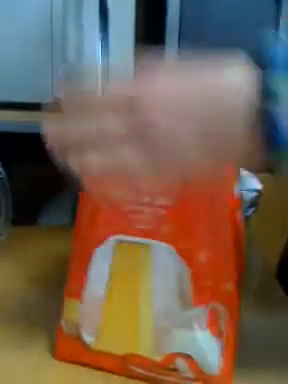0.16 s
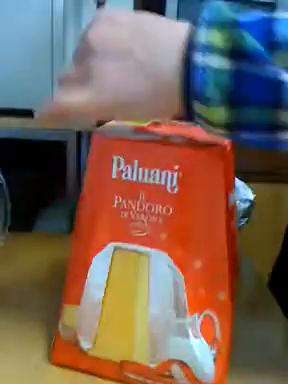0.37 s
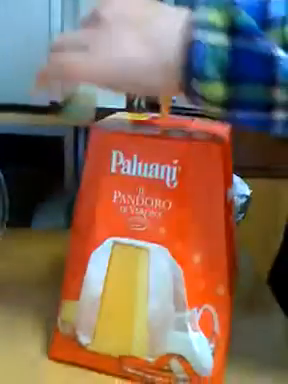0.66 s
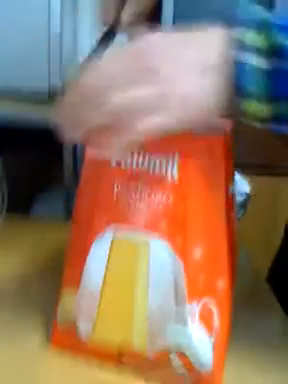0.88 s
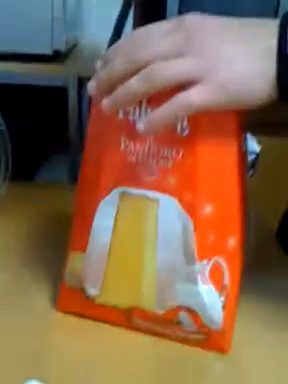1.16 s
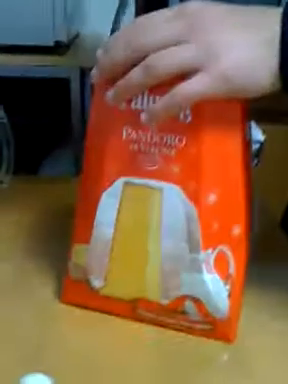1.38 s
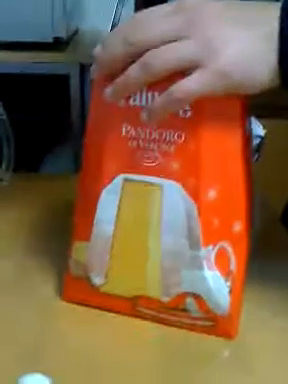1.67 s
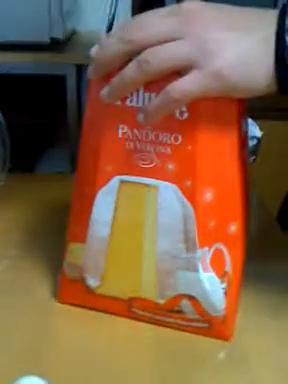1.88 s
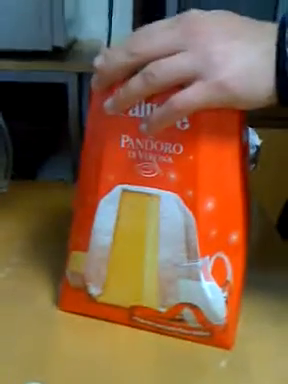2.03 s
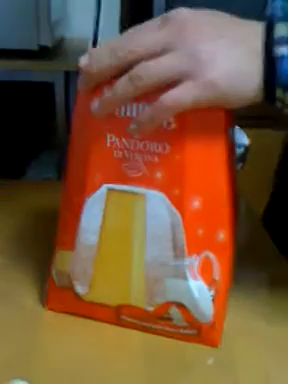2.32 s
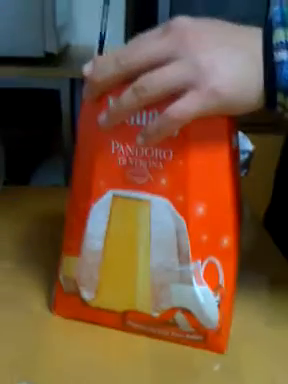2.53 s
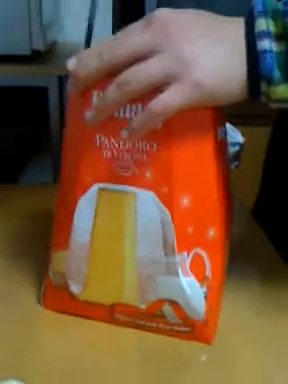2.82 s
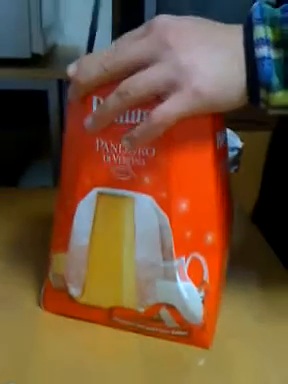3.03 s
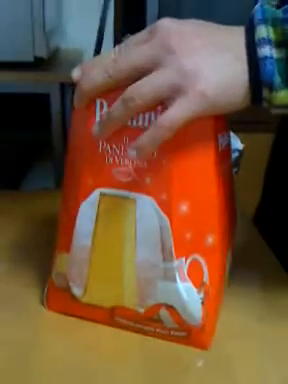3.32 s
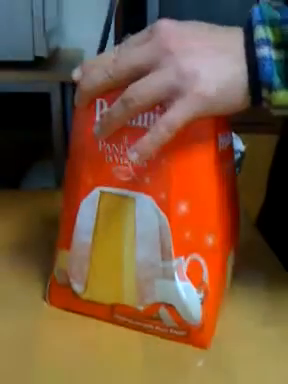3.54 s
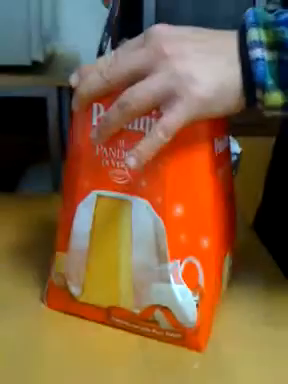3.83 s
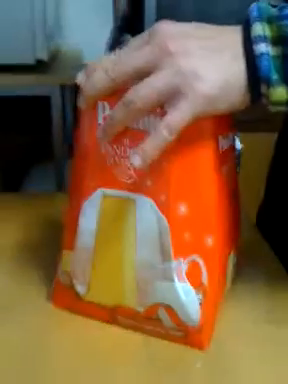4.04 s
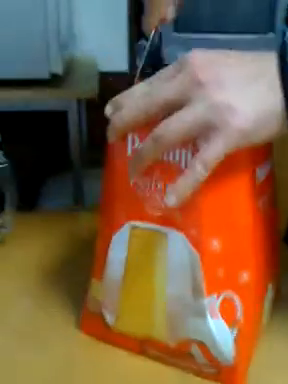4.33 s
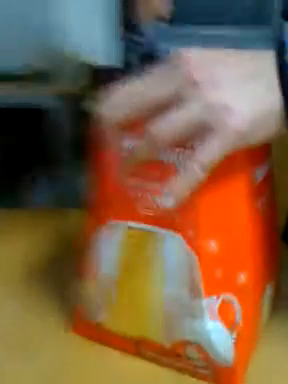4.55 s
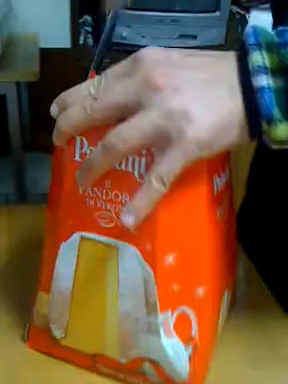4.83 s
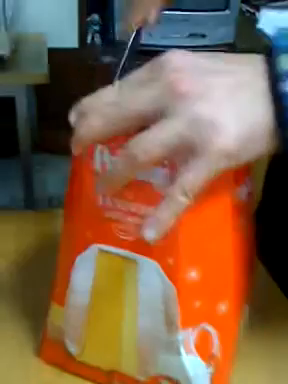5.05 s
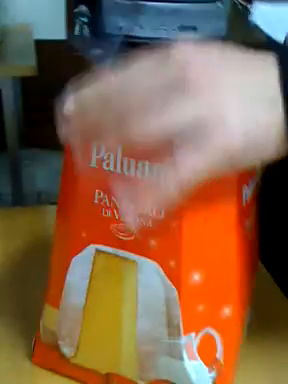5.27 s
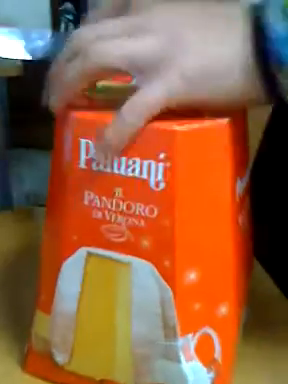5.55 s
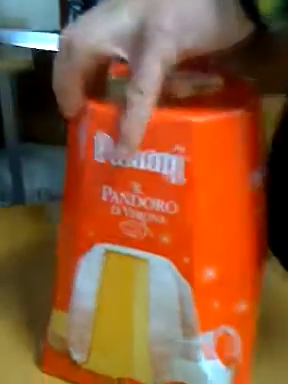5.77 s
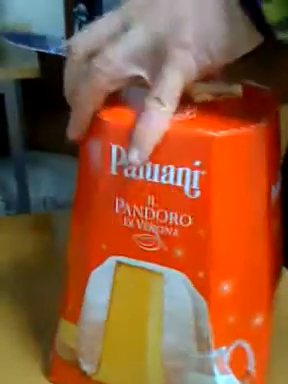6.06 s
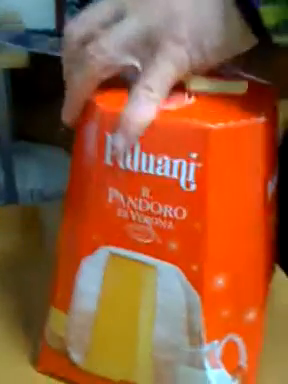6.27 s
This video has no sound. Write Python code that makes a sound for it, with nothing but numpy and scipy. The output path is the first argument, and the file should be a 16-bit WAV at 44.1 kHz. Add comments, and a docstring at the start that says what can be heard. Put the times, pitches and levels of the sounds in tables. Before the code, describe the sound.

A small quiet room carries steady soft broadband noise, slight microphone hiss and faint wavering low hum. Close by, a faint papery rub fades during the first 0.3 seconds; a light brush comes near 0.75, and tiny ticks follow. From 1.5 to 2.7 seconds there are dry clicks, short scrapes and a soft hollow thump at 2.06. From 2.8 to 4.3 the sawing strokes come quicker and rougher, with crisp fibre ticks, and a bright wall knock at 4.33. Between 4.4 and 5.1 the hollow box groans and judders loudly around 230 to 430 hertz, with knocks and a hard crack at 4.91. A snap at 5.13 leads into quieter rubbing until 5.8. Crackling then grows; a deep double thump lands at 6.12, and sharp bright snaps and tearing, strongest at 6.25, continue to the end at about 6.4.

```python
"""On a wooden table in a quiet kitchen, a knife saws in short strokes at the lid of a hollow cardboard box.
Each stroke is made of random slips that ring the thin lid (rasp), the walls, the air inside and the table.
Snapping fibres are clicks and bursts of noise, knocks are short pushes that ring the box, and
brief glides on the glossy print are narrow hisses. A little room echo follows these sounds.
The kitchen is broad noise, microphone hiss included, with a few wavering low tones."""
import sys
import numpy as np
from scipy import signal
from scipy.fft import rfft, irfft, next_fast_len
from scipy.io import wavfile
from scipy.ndimage import uniform_filter1d

SR = 44100
rng = np.random.default_rng(int(sys.argv[2]) if len(sys.argv) > 2 else 0)


def master(y):
    """Save y as 16-bit WAV."""
    cut = np.clip(np.atleast_2d(y).T, -1, 1)
    pcm = np.round(cut * 32767)  # scale
    wavfile.write(sys.argv[1], SR, pcm.astype(np.int16))


N = 281903  # length in samples

# Colour of the kitchen noise: [f/Hz, relative level per Hz/dB]
KITCHEN_COLOUR = [(15, -31), (25, 10), (74, -15), (96, -6.5), (221, -3), (251, -11), (318, -5.5),
                  (433, -15.5), (547, -16.5), (851, -22), (1020, -23), (2880, -29), (10000, -32.5),
                  (12300, -38.5), (16000, -79), (22000, -120)]
# Wavering appliance tones: [f/Hz, width of each filter pass/Hz, rms level/dB]
APPLIANCE_TONES = [(66.8, 4, -60), (214.2, 8, -65.5), (288.4, 21, -61.5), (326.5, 9.7, -61),
                   (1032, 170, -68.5)]
# Skin or blade gliding on the glossy print:
# [middle t/s, half length/s, f/Hz, width of each filter pass/Hz, rms level at the middle/dB]
GLIDES = [(0.746, 0.015, 4800, 1300, -50.5), (5.163, 0.037, 4320, 400, -52.5),
          (5.36, 0.042, 6550, 500, -60)]
# Resonances of the air in the box, its walls, the thin lid and the table top:
# [f/Hz, width/Hz, relative level/dB]
AIR_MODES = [(111, 18, -5), (152.5, 119, -1.5), (185.7, 48, 2), (211.2, 22.2, 0), (260.5, 16.2, -4),
             (323, 20.5, 0), (395.3, 30.2, -1), (427.7, 44.6, -2.5), (520, 58, -9.5), (545, 39, -8)]
WALL_MODES = [(706, 226, 1.5), (965, 72, 3.5), (1177, 142, 1), (1350, 86, 1), (1465, 85, 0),
              (1790, 300, -3), (2040, 58, 2.5), (2265, 720, -4), (2700, 890, -7.5)]
LID_MODES = [(3570, 2060, -6.5), (4265, 123, -1), (4620, 270, -10), (5430, 290, -1), (5800, 710, -5.5),
             (6380, 176, -1.5), (6740, 190, -3.5), (8120, 1320, -6), (9010, 1880, -7)]
TABLE_MODES = [(42, 52, 1), (105, 108, 0.5)]
# Knocks of box on table or blade on box:
# [t/s, boom peak level/dB, wall peak level/dB, contact time/ms, favoured boom f/Hz]
KNOCK_EVENTS = [(0.902, -42, -45, 3.2, 342), (1.048, -48, -48, 2.1, 275), (2.062, -22, -36.5, 2, 377),
                (2.827, -29.5, -45, 1.6, 328), (4.26, -33, -38, 0.66, 345), (4.334, -31, -21.5, 0.83, 412),
                (4.355, -33, -48, 1.2, 400), (4.742, -18.5, -24, 1.3, 305), (4.799, -22.5, -27.5, 1.3, 444),
                (4.893, -15.5, -23.5, 2.8, 426), (4.991, -29, -27.5, 1.31, 334.8),
                (5.055, -26.5, -46, 1.07, 204.2), (5.103, -22, -23.5, 0.48, 223.5),
                (5.227, -35, -28.5, 0.61, 334), (5.326, -35, -35.5, 0.67, 334), (5.427, -35, -38, 2.3, 336),
                (5.99, -18.5, -48, 2.1, 340), (6.123, -9.5, -32, 1.54, 160),
                (6.128, -9.5, -14.5, 0.78, 404), (6.159, -34, -36, 1.7, 203)]
# Fibres and glue letting go: [t/s, burst peak level/dB, drive level into the walls/dB, centre f/Hz]
FIBRE_SNAPS = [(.19, -43, -58, 2290), (.885, -49, -60, 5800), (1.05, -45, -40, 1900),
               (1.14, -50, -50, 1820), (1.493, -27, -33.5, 7300), (1.519, -39, -58, 5650),
               (1.6806, -38.5, -40, 2090), (1.693, -33, -37, 5590), (1.791, -40.5, -40, 5600),
               (1.8716, -41, -52, 1960), (2.022, -36, -51, 5660), (2.049, -29.5, -58, 5800),
               (2.4362, -40, -34.5, 2000), (2.671, -41, -33.5, 2320), (2.7097, -44, -35, 1970),
               (2.9263, -36, -39, 6100), (3.1584, -35, -46, 1860), (3.1722, -46, -38, 2360),
               (3.2742, -25.5, -51, 7200), (3.405, -44, -30.5, 1840), (3.4514, -32, -36, 5060),
               (3.637, -36, -39.5, 6520), (3.7167, -50, -27, 1760), (3.7677, -38, -33, 1850),
               (3.878, -33.5, -38, 6290), (3.9228, -32, -28, 1970), (4.154, -36, -41, 1880),
               (4.284, -41, -41, 6440), (4.565, -34, -40, 1850), (4.7376, -33, -34, 1890),
               (4.8721, -42, -27, 6000), (4.9094, -11, -43, 4370), (5.1289, -20, -26, 4500),
               (5.2603, -27.5, -43, 1730), (5.657, -36, -54, 3500), (5.7193, -26.5, -35, 5260),
               (5.791, -39, -40, 2440), (5.88, -27.5, -28, 4230), (5.897, -27, -46, 5610),
               (5.957, -21, -36, 5900), (5.9896, -16, -38, 5400), (6.0105, -25, -40, 6300),
               (6.1092, -23.5, -29, 1730), (6.1501, -17, -19, 5900), (6.2052, -31, -38, 6130),
               (6.2518, -7, -13.5, 5810), (6.2674, -17.5, -49, 1734), (6.279, -16.5, -49, 1790),
               (6.3064, -18, -45, 1940), (6.34, -30, -47, 1840), (6.3691, -15.5, -32, 1710)]
# Knife strokes and hand rubs: [hardest at t/s, rise/s, fall/s, rasp level/dB, wall level/dB,
# hollow boom level/dB, table rumble level/dB, favoured boom f/Hz]
KNIFE_STROKES = [(.034, 0.19, 0.17, -54.5, -47.5, -46.5, -49, 240),
                 (.745, 0.093, 0.11, -58, -60, -49, -55, 280),
                 (1.698, 0.037, 0.025, -49.5, -43, -42.5, -46, 260),
                 (2.075, 0.036, 0.16, -56.5, -51.5, -45, -41.5, 290),
                 (2.27, 0.13, 0.12, -72, -66, -44, -50, 235),
                 (2.445, 0.067, 0.11, -56.5, -51.5, -59, -54, 235),
                 (2.54, 0.32, 0.24, -56.5, -56, -48, -51, 288),
                 (2.682, 0.027, 0.23, -50.5, -49, -46.5, -47, 242),
                 (2.843, 0.058, 0.061, -56, -55, -40.5, -40.5, 276),
                 (2.94, 0.033, 0.14, -48, -44.5, -40.5, -47, 244),
                 (3.04, 0.11, 0.066, -50, -49.5, -40.5, -44.5, 295),
                 (3.165, .02, 0.084, -43, -45, -53, -51, 240),
                 (3.2, 0.088, 0.096, -50.5, -42, -32.5, -43.5, 265),
                 (3.281, .05, .11, -45, -44, -35, -41, 300),
                 (3.452, 0.09, 0.036, -49.5, -44, -39.5, -44, 223),
                 (3.524, .04, 0.057, -48.5, -46.5, -35, -40.5, 271),
                 (3.7, 0.056, 0.14, -50, -43.5, -42, -44, 300),
                 (3.775, .06, 0.09, -51, -49, -43, -37.5, 260),
                 (3.941, 0.078, 0.079, -46.5, -40.5, -35.5, -40.5, 267),
                 (4.065, .11, 0.091, -41.5, -40, -33.5, -39.5, 332),
                 (4.164, 0.033, 0.13, -49.5, -42.5, -39.5, -46, 250),
                 (4.21, 0.087, 0.1, -50, -48, -44, -47, 250),
                 (4.291, 0.092, 0.14, -49.5, -47.5, -42.5, -55, 370),
                 (4.346, 0.041, 0.033, -50.5, -52, -29.5, -40, 424),
                 (4.467, 0.066, 0.059, -41.5, -34, -24, -32, 236),
                 (4.599, 0.066, 0.094, -40, -34, -25, -42, 347),
                 (4.643, 0.11, 0.072, -40.5, -41.5, -29, -37, 275),
                 (4.75, 0.054, 0.13, -43, -31.5, -19.5, -38, 292.8),
                 (4.78, 0.038, 0.041, -58, -36, -20.5, -52, 299.7),
                 (4.908, 0.057, .11, -30, -29.5, -19.5, -32.5, 380),
                 (5.059, 0.043, 0.13, -48.5, -43, -21.5, -55, 233.7),
                 (5.095, 0.11, 0.081, -58.5, -41, -24, -57, 217),
                 (5.137, .05, 0.097, -52, -46.5, -44, -60, 245),
                 (5.229, 0.062, 0.14, -53.5, -48.5, -38.5, -47, 346),
                 (5.334, 0.035, 0.29, -60, -54.5, -41.5, -55, 330),
                 (5.56, 0.17, .2, -60, -53, -48.5, -49, 290),
                 (5.655, 0.23, 0.17, -47, -51, -45.5, -49, 270),
                 (5.817, 0.15, 0.071, -61, -52, -42, -52.5, 270),
                 (5.884, 0.01, 0.32, -43, -41, -36.5, -60, 265),
                 (5.965, 0.062, 0.18, -38, -37, -35.5, -56, 290),
                 (6.013, 0.14, 0.033, -36.5, -32.5, -36.5, -34.5, 288),
                 (6.126, 0.053, 0.042, -34, -32.5, -30, -46, 197),
                 (6.158, 0.045, 0.074, -34, -31.5, -30.5, -50, 214),
                 (6.21, 0.064, 0.078, -38.5, -37, -32.5, -55, 304),
                 (6.295, 0.063, 0.096, -35, -34, -33, -47, 390),
                 (6.39, 0.04, 0.046, -35, -34, -29, -41, 270)]
# The blade's place on the box favours other wall modes: [t/s, favoured wall f/Hz]
WALL_PITCH_PATH = [(0, 830), (4.3, 870), (4.45, 910), (4.75, 700), (5.8, 1013), (5.97, 1260), (6.12, 895),
                   (6.25, 1580), (6.39, 1640)]

KITCHEN_DB = -47.5
ROOM_T60_S, ROOM_DB = 0.24, -16.5  # echo: time to fall 60 dB, level against the direct sound
SNAP_T60_S, TEAR_DB = 0.014, -20.5  # snap: time to fall 60 dB, drive of its tear against its peak
RASP_HZ = 5680  # favoured pitch of the lid
# Level lost over one rise or fall time, in dB: rasp and walls, hollow boom, table rumble
FADE_DB, BOOM_FADE_DB, RUMBLE_FADE_DB = 23.5, 32, 12.5
ROUNDNESS = 1.038  # shape of a stroke: 1 = pointed peak, 2 = bell
TOP_HZ = 12200  # the treble is cut above this


def undb(db):
    """Turn decibels into a gain."""
    return 10 ** (np.asarray(db) / 20)


def unit(x):
    """Scale a sound to an rms level of 1."""
    return x / np.sqrt(np.mean(x ** 2))


def band(x, hz, width):
    """One resonance, which leaves its centre pitch at gain 1."""
    return signal.lfilter(*signal.iirpeak(hz, hz / width, fs=SR), x)


def narrow_noise(hz, width):
    """Noise passed twice through one resonance, at rms 1."""
    return unit(band(band(rng.standard_normal(N), hz, width), hz, width))


def walk(rate):
    """Random levels held for 1 / rate seconds, with smooth slides between them."""
    hold = int(SR / rate)
    steps = np.repeat(rng.standard_normal(N // hold + 1), hold)
    return uniform_filter1d(steps, hold)[:N]


def ring(x, modes, favour_hz=None, octaves=1., sway_db=0.):
    """A body's resonances: grip and blade place favour one pitch, bending makes each mode swell and fade."""
    out = 0
    for k, (hz, width, db) in enumerate(modes):
        if favour_hz is not None:
            db = db - 6 * (np.log2(hz / favour_hz) / octaves) ** 2
        if sway_db:
            db = db + sway_db * walk(25)
        sign = (-1) ** k  # neighbours move in opposite directions
        out = out + sign * undb(db) * band(x, hz, width)
    return out


def grit(per_s, scatter_db):
    """Random slips: clicks of either sign, a few much larger than the rest."""
    hit = rng.random(N) < per_s / SR
    size = undb(scatter_db * rng.exponential(size=N))
    return unit(hit * rng.standard_normal(N) * size)


def kitchen():
    """Broad noise with a barely wavering level, plus narrow wavering tones, mostly in the bass."""
    hz, db = np.transpose(KITCHEN_COLOUR)
    n = next_fast_len(N)
    bin_hz = np.arange(n // 2 + 1) * SR / n
    colour = undb(np.interp(np.log(bin_hz + 1), np.log(hz), db))
    noise = irfft(rfft(rng.standard_normal(n)) * colour, n)[:N]
    air = unit(noise) * undb(KITCHEN_DB + 0.11 * walk(9.6))
    tones = sum(undb(level) * narrow_noise(f, width) for f, width, level in APPLIANCE_TONES)
    return air + tones


def room(x):
    """Echoes blur into a short noisy tail that gets duller as it dies."""
    t = np.arange(SR // 2) / SR
    noise = rng.standard_normal(len(t))
    fade = np.exp(-np.log(1000) * t / ROOM_T60_S)
    dull = uniform_filter1d(noise, size=6) * fade
    bright = .5 * noise * fade ** 2  # dies twice as fast
    tail = (dull + bright) * (t > .004)
    return x + undb(ROOM_DB) * signal.fftconvolve(x, tail / np.linalg.norm(tail))[:N]


def swishes():
    """Gliding makes smooth noise in one narrow band, which swells and fades."""
    t = np.arange(N) / SR
    out = 0
    for s, half, hz, width, db in GLIDES:
        bump = np.exp(-((t - s) / half) ** 2)
        out = out + undb(db) * bump * narrow_noise(hz, width)
    return out


def half_sine(t_ms, length_ms):
    """A push that rises and falls once."""
    return np.sin(np.pi * np.minimum(t_ms / max(length_ms, .1), 1))


def knocks():
    """A push rings the hollow, deeper when contact is long; a brief touch rings the walls."""
    out, t_ms = np.zeros(N), np.arange(8192) / SR * 1000
    for s, db, wall_db, contact_ms, hz in KNOCK_EVENTS:
        boom = ring(half_sine(t_ms, contact_ms), AIR_MODES, hz, octaves=1.0)
        wall = ring(half_sine(t_ms, .6), WALL_MODES, 810.0, octaves=1.0)
        knock = undb(db) * boom / np.abs(boom).max()
        knock = knock + undb(wall_db) * wall / np.abs(wall).max()
        i = int(s * SR)
        out[i:i + len(t_ms)] += knock[:N - i]
    return out


def snaps():
    """Each snap is a click and a dying burst round its own pitch, a tap on the walls and a short tear."""
    out, taps, tears = np.zeros(N), np.zeros(N), np.zeros(N)
    t = np.arange(6000) / SR
    for s, db, wall_db, hz in FIBRE_SNAPS:
        i = int(s * SR)
        noise = rng.standard_normal(len(t))
        noise[0] = 5.2  # the click
        burst = (noise * np.exp(-np.log(1000) * t / SNAP_T60_S))[:N - i]
        bright = .5 * band(burst, hz, 0.28 * hz) + 0.095 * ring(burst, LID_MODES)
        span, tear_gain = slice(i, i + len(t)), undb(db + TEAR_DB)
        out[span] += undb(db) * bright / np.abs(bright).max()
        taps[span] += undb(wall_db) * burst
        tears[span] += tear_gain * (noise * np.exp(-(t / 0.098) ** 2))[:N - i]
        flap = band(noise * np.exp(-t / 0.042), hz, 0.05 * hz)[:N - i]  # the loose flap rings on
        out[span] += 0.53 * tear_gain * flap
    return out + 1.51 * ring(taps + 0.15 * tears, WALL_MODES) + 0.5 * ring(tears, LID_MODES)


def rips(per_s, fade_s, depth):
    """A gain that jumps whenever a run of fibres gives way and then dies back."""
    jumps = np.abs(grit(per_s, 1.0))
    dying = signal.lfilter([1], [1, -np.exp(-1 / (fade_s * SR))], jumps)
    return 1 + depth * dying * np.sqrt(per_s / SR)


def swell(peaks_db, fade_db):
    """Level in dB: each stroke climbs to its peak and dies away; overlapping strokes add their power."""
    t, power = np.arange(0, N / SR, .001), 1e-12
    for (s, rise, fall, *_), db in zip(KNIFE_STROKES, peaks_db):
        away = np.maximum((s - t) / max(rise, .005), (t - s) / max(fall, .005))
        power = power + undb(db - fade_db * away ** ROUNDNESS) ** 2
    return np.interp(np.arange(N) / SR, t, 10 * np.log10(power))


def saw():
    """The blade's slips drive the box: dense fine ones the lid, sparser ones the walls, hollow and table."""
    s, _, _, rasp_top, wall_top, boom_top, table_top, boom_pitch = np.transpose(KNIFE_STROKES)
    t = np.arange(N) / SR
    rasp_db, wall_db = swell(rasp_top, FADE_DB), swell(wall_top, FADE_DB)
    boom_db, table_db = swell(boom_top, BOOM_FADE_DB), swell(table_top, RUMBLE_FADE_DB)
    boom_hz = np.interp(t, s, boom_pitch)
    wall_hz = np.interp(t, *np.transpose(WALL_PITCH_PATH))

    drag = grit(3000, 1.67)
    # light strokes glide, hard ones rip
    tearing = rips(55.0, 0.0038, 0.7 * np.clip((rasp_db + 61.5) / 20, 0, 1))
    lid = ring(grit(16000, 2.1) * tearing, LID_MODES, RASP_HZ, octaves=0.94, sway_db=2.0)
    walls = ring(drag * tearing ** 0.24, WALL_MODES, wall_hz, octaves=1.7, sway_db=3.0)
    hollow = ring(drag, AIR_MODES, boom_hz, octaves=0.47)
    rumble = ring(drag, TABLE_MODES)

    # pressed hard, the blade sticks and slips in step with the favoured boom, its pitch wavering
    judder = np.sin(2 * np.pi * np.cumsum(boom_hz * (1 + 0.0473 * walk(45))) / SR)
    pressed = np.clip((boom_db + 28.0) / 14, 0, 1.2)
    boom = undb(boom_db) * (unit(hollow) + pressed * judder)
    return undb(rasp_db) * unit(lid) + undb(wall_db) * unit(walls) + boom + undb(table_db) * unit(rumble)


def scene():
    """Everything at the box sounds in the room, over the kitchen."""
    box = swishes() + knocks() + snaps() + saw()
    return (kitchen() + room(box))[None]


def record(dry):
    """The deepest bass is lost; the treble droops near the top, then is cut."""
    no_rumble = signal.sosfilt(signal.butter(2, 30, "high", fs=SR, output="sos"), dry)
    droop = signal.sosfilt(signal.butter(10, 10900, fs=SR, output="sos"), no_rumble)
    return signal.sosfilt(signal.ellip(10, .2, 70, TOP_HZ, fs=SR, output="sos"), droop)


dry = scene()
out = record(dry)
master(out)
```